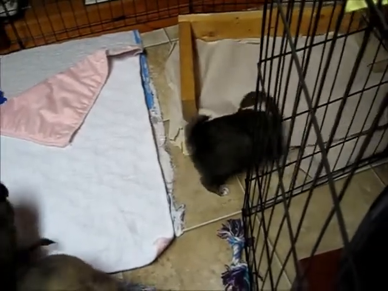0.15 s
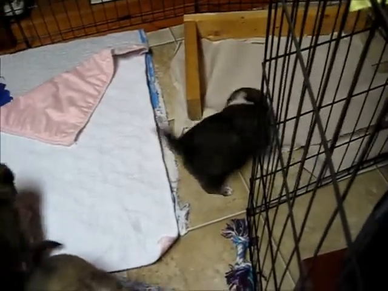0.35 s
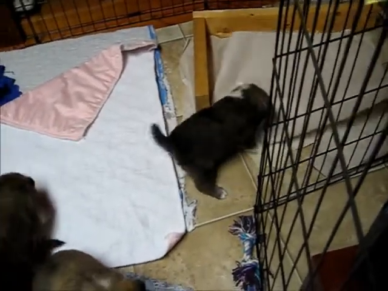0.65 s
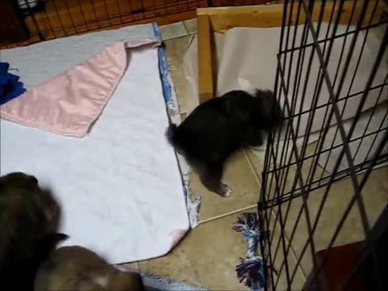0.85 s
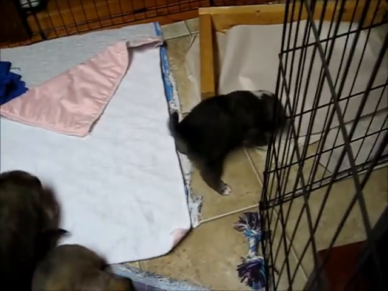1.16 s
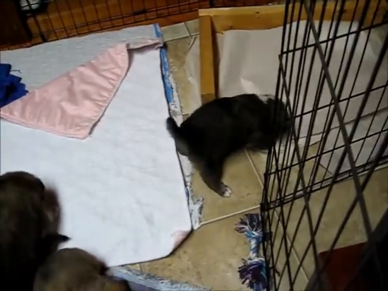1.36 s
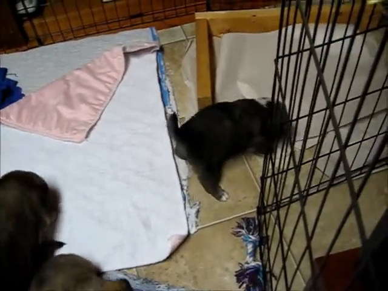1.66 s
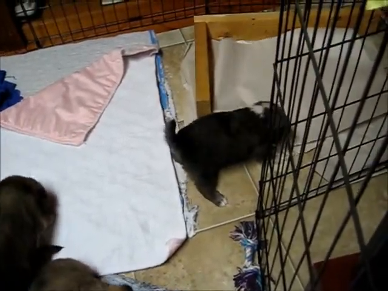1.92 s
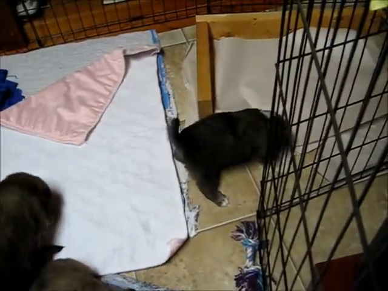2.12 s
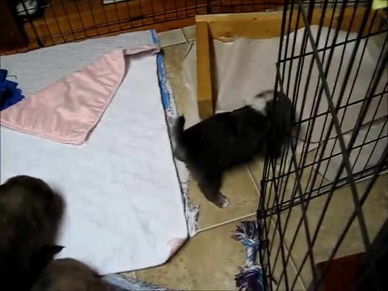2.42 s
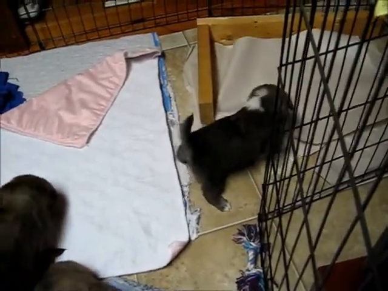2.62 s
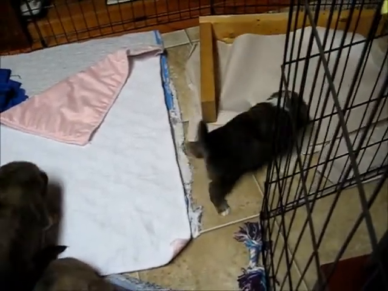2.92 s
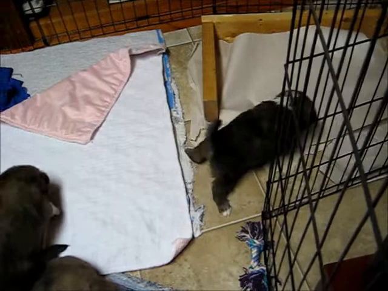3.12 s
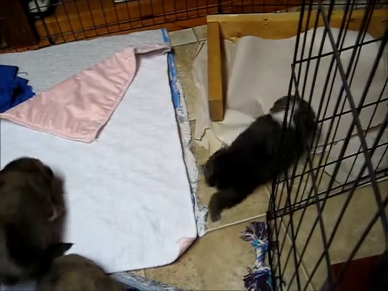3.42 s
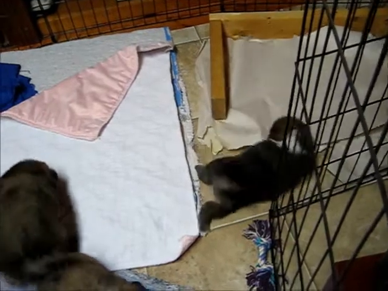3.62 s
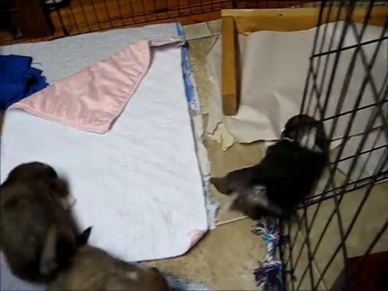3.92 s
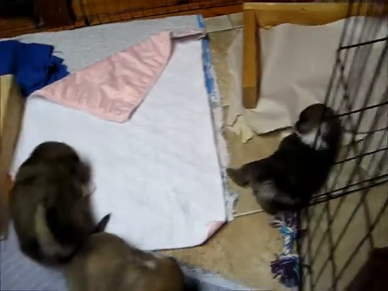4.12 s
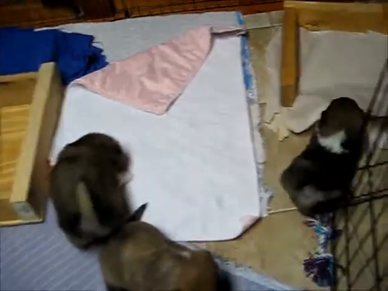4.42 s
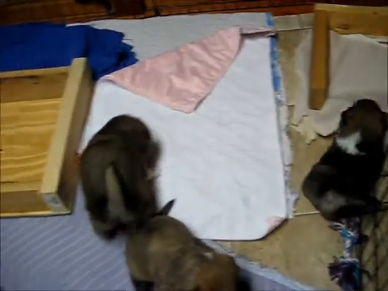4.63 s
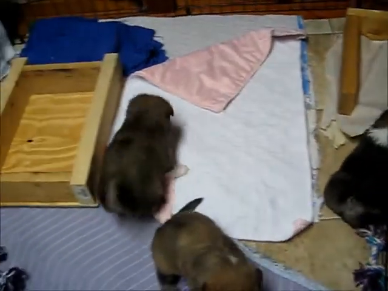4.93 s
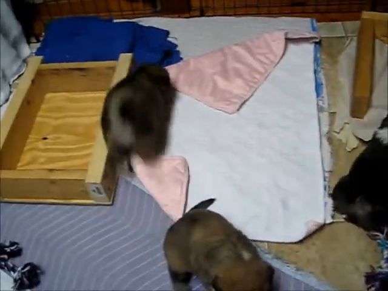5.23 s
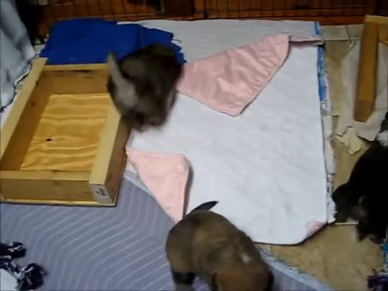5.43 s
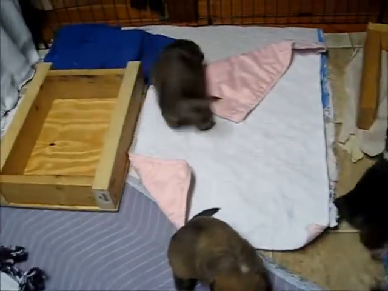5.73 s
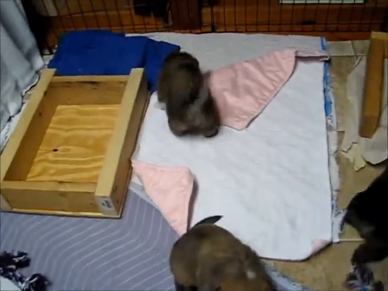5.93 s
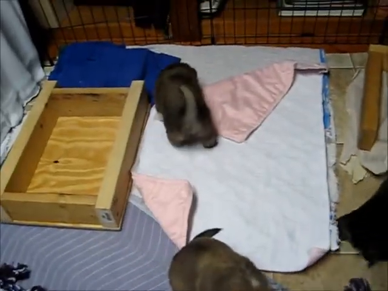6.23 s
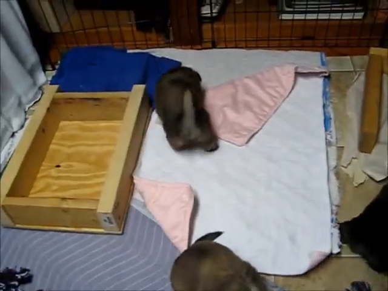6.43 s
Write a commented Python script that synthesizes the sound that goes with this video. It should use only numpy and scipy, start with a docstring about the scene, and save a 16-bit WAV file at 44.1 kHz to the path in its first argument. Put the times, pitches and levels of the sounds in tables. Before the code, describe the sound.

Puppies move around a pen in a small tiled room, heard from nearby with only brief reflections. From the start, claws tick sharply on tile and crinkle paper, mixed with short scratchy rustles of paws dragging over floor pads, with a strong cluster around 0.6 seconds. A few taps follow until 1.4 seconds, then the movement eases to faint shuffling. Ticks and scuffs return from about 2 to 2.7 seconds, followed by a quieter stretch around 3.2 seconds. From 3.6 seconds the pattering and rustling grow busy again, with sharper clicks near 5 and 5.3 seconds. After a brief lull near 5.9 seconds, a last flurry of taps and scraping comes around 6.2 seconds and trails into rustling. A few soft, dull footfalls are barely audible. A quiet hiss, rumble, hum and thin high electrical whine run throughout.

```python
"""A small room with a tiled floor, where puppies scramble about in a wire pen.
Impacts of claws tick on the tiles and crumple paper, and each knock briefly excites the pen's resonances.
Padded paws thump softly and drag over the floor pads, rustling by stick-slip friction.
Wall reflections follow the impacts; behind all lie a quiet rumble, hiss, hum and a thin electrical whine."""
import sys
import numpy as np
from scipy import signal
from scipy.fft import rfft, irfft
from scipy.io import wavfile

SR = 44100
rng = np.random.default_rng(int(sys.argv[2]) if len(sys.argv) > 2 else 0)


def inscribe(sig):
    """Save sig as 16-bit PCM at rate SR to the path in sys.argv[1].

    A 1-D sig is mono; a 2-D sig holds one channel per row.
    Samples are clipped to [-1, 1] before scaling.
    """
    pcm = np.round(np.clip(np.atleast_2d(sig).T, -1, 1) * 32767)
    wavfile.write(sys.argv[1], SR, pcm.astype(np.int16))


N = 289296
TIME = np.arange(N) / SR

# paw strikes and paper snaps:
# (time [s], middle-band level [dB], tick's energy share [0-1], treble [dB re level], ring pitch [Hz])
STRIKES = [(0.05, -20, 0.72, -8.5, 3960), (0.07, -22, 0.23, -8, 1490), (0.249, -22.5, 0.16, -28, 2600),
           (0.382, -27.5, 0.66, -4.5, 5800), (0.403, -25, .2, -12, 3170), (0.461, -27, 0.4, -12, 1590),
           (0.579, -25, 0.3, -11, 4100), (0.589, -21, .2, -6.5, 4080), (0.602, -18.5, 0.86, -3, 5630),
           (0.624, -19, 0.17, -4, 4300), (0.769, -31, 0.8, -21, 2530), (0.819, -27.5, 0.2, -24, 2000),
           (0.866, -27, .1, -30, 2560), (1.049, -23, 0.06, -10, 1200), (1.064, -20.5, 0.2, -7.5, 1050),
           (1.3715, -24.5, 0.3, -1.5, 970), (1.374, -23, 0.96, -20, 3740), (1.432, -37.5, 0.7, -18, 4200),
           (1.661, -39.5, 0.06, -21, 1500), (1.718, -35.5, 0.3, -30, 810), (1.778, -26, 0.24, -17, 3480),
           (2.056, -24.5, 0.2, -5.5, 4960), (2.097, -32.5, 0.3, -11, 3000), (2.135, -28.5, 0.45, -8, 3040),
           (2.317, -26.5, 0.7, -16, 1110), (2.343, -26, 0.7, -3, 3230), (2.443, -26, 0.84, -15, 940),
           (2.597, -33.5, 0.24, -7, 547), (2.695, -23, 0.16, -11.5, 2120), (2.957, -36.5, 0.9, -11, 1290),
           (3.206, -39, 0, -22, 680), (3.371, -34, 0.2, -21, 1810), (3.644, -25.5, .6, -6, 4650),
           (3.773, -28, .9, -31, 3130), (3.803, -26.5, 0.4, -7.5, 3500), (3.996, -25, 0.6, -14, 3650),
           (4.059, -29.5, 0.13, -24, 2400), (4.158, -24.5, 0.56, -6, 3940), (4.259, -26, 0.5, -11, 5040),
           (4.285, -26.5, 0.4, -14, 4000), (4.303, -24.5, 0, -9, 2920), (4.354, -24, 0.9, -12, 3320),
           (4.796, -28.5, 0, -4.5, 4020), (4.811, -27.5, 0.5, -7, 2780), (4.873, -30.5, 0.37, -7, 910),
           (4.896, -26, 0.3, -18, 3050), (4.971, -17.5, 0.44, -6.5, 2970), (5.144, -34, 0.8, -7.5, 2900),
           (5.202, -34, 0.4, -25, 2860), (5.251, -19, 0.08, -12.5, 3350), (5.306, -22.5, 0.25, -9.5, 3080),
           (5.351, -25.5, 0.3, -10.5, 2520), (5.389, -25, 0.16, -17, 2000), (5.404, -24.5, 0.5, -0.5, 4940),
           (5.464, -23.5, .6, -8.5, 2300), (5.625, -24, 0.2, -2, 1000), (5.766, -34, 0.8, -2, 3000),
           (5.978, -33.5, 0.5, -10, 3000), (6.045, -30, 0.07, -19, 1900), (6.104, -27.5, 0.1, -7, 2700),
           (6.169, -21.5, .2, -6, 4770), (6.181, -19.5, 0.16, -9, 2380), (6.216, -23.5, 0.1, -17, 2400),
           (6.256, -24.5, 0.15, -9, 1300), (6.324, -18.5, 0.35, -6, 2330)]
# strokes of a paw or body over paper and pads:
# (start [s], length [s], rustle level [dB], dull scuff [dB re rustle], crisp treble [dB re rustle])
STROKES = [(0.006, 0.087, -28, -10, -8), (0.17, 0.12, -33, -8, -11), (0.364, 0.099, -31.5, -5, -4.5),
           (0.536, 0.099, -27, -11, -8), (0.667, 0.115, -34.5, -28, -2), (0.755, 0.049, -21.5, -23, -15),
           (0.855, 0.13, -32.5, -10.5, -9), (1.16, 0.26, -38.5, -12, -10.5), (1.42, 0.069, -43.5, -18, -6),
           (1.614, 0.23, -54, 7, -28), (1.97, 0.10, -41, -14, -6), (2.216, 0.093, -27.5, -16.5, -10),
           (2.386, 0.13, -28, -5.5, -15), (2.577, 0.21, -37.5, -5.5, -16), (2.853, 0.034, -37.5, -2, -6),
           (2.962, 0.06, -33.5, -13, -4), (3.06, 0.076, -44.5, -5, -4), (3.388, 0.16, -37, -13, -3.5),
           (3.6, 0.22, -27.5, -13, -11), (3.88, 0.062, -32.5, -20, -5), (4.072, 0.05, -34.5, -7, -5),
           (4.324, 0.1, -25, -12.5, -8), (4.458, 0.14, -32.5, -16.5, -3), (4.659, 0.18, -34.5, -30, -5),
           (4.912, 0.11, -27, -8, -9.5), (5.103, 0.21, -36.5, -10, -8), (5.252, 0.28, -33, -4.5, -15),
           (5.55, 0.059, -33, 2, -12), (5.64, 0.024, -31.5, -11, -12), (5.75, 0.034, -36, -1, -11),
           (6.167, 0.19, -24, -9, -14.5), (6.407, 0.22, -32.5, -7, -9)]
# faint shuffle of bodies between strokes: (low band [dB], middle band [dB], treble band [dB])
SHUFFLE_DB = [-47, -42, -50]
# moments when the puppies hold nearly still: (start [s], length [s])
RESTS = [(1.556, 0.14), (1.86, 0.12), (3.227, 0.11), (5.848, 0.11)]
# soft footfalls on the pads: (time [s], level [dB])
FOOTFALLS = [(0.441, -61), (0.592, -65), (2.438, -68), (2.597, -55), (2.691, -58), (5.709, -55.5),
             (6.331, -70)]
# normal modes of the pen and floor: (frequency [Hz], bandwidth [Hz], gain [dB])
PEN_MODES = [(480, 140, -1.5), (894, 104, -2), (1177, 30, -0.5)]
# low, middle and treble band: (lower edge [Hz], upper edge [Hz])
BANDS_HZ = [(150, 1500), (1500, 6000), (6000, 17000)]
# reverberation time of the room: (low band [s], middle band [s], treble band [s])
ROOM_T60 = [0.19, 0.21, 0.25]
# spectral envelopes of impacts, friction and room noise: (frequency [Hz], relative level [dB])
STRIKE_SPECTRUM = [(200, -26), (450, -12), (700, -6), (1000, -1), (1700, 1), (2500, 4), (4000, 3.5),
                   (5600, -1), (7500, -9), (10000, -15), (16000, -31.5)]
DRAG_SPECTRUM = [(200, -13.5), (450, -10.5), (700, -2.5), (1000, -1), (1700, 2), (2500, 6), (4000, 4),
                 (5600, 0), (7500, -6.5), (10000, -10.5), (16000, -26.5)]
NOISE_SPECTRUM = [(20, -4.5), (80, 1.5), (140, 2.5), (300, 3), (600, 3.5), (1200, -5), (2500, 3.5),
                  (6500, -0.5), (7300, -10), (7650, -1), (8400, -2.5), (9200, -1.5), (10000, 6),
                  (10700, -1), (11300, -1), (12300, -9), (16000, -18)]
# mains hum and electrical whine: (frequency [Hz], rms level [dB])
ELECTRICAL_TONES = [(120, -71.5), (7560, -57), (15140, -64.5)]


def strikes(rows, tick_s=0.0013, crumple_s=0.01, press_s=0.0007, ring_q=5.1, wet_db=(-3, -3, -4)):
    """Impact excitation: a claw tick and a burst of crumpling ring each spot at its own frequency."""
    t = TIME[:SR // 4]
    out = np.zeros(N + len(t))
    for time, level_db, tick_share, treble_db, ring_hz in rows:
        thud_db = -4.5 - 6 * np.log2(ring_hz / 1000)   # the lower a spot rings, the heavier its thud
        band_db = level_db + np.array([thud_db, 0, treble_db])
        tick = rng.standard_normal(len(t)) * np.exp(-t / tick_s)
        crumple = grains(len(t), per_s=3900, spread_db=3.0)
        crumple *= np.exp(-t / crumple_s) * (1 - np.exp(-t / press_s))
        contact = np.sqrt(tick_share) * tick / rms(tick) + np.sqrt(1 - tick_share) * crumple / rms(crumple)
        wet_gains = from_db(np.array(wet_db) - 9 * tick_share)   # clean ticks on bare tile stop sooner
        start = int(time * SR)
        for edges, db, wet, t60 in zip(BANDS_HZ, band_db, wet_gains, ROOM_T60):
            reverberant = contact + wet * reverberation(t, t60)
            knock = pen(colour(reverberant, STRIKE_SPECTRUM))
            band = band_pass(knock + resonance(knock, ring_hz, ring_hz / ring_q), edges)
            out[start:start + len(t)] += from_db(db) * band / rms(band[:SR // 32])   # first 31 ms set the level
    return out[:N]


def patter(rustle, count=18, above_rustle_db=1, spread_db=1, tick_share=0.43, treble_db=-10):
    """Random point process: stray claw ticks about as strong as the rustle, as rows like STRIKES."""
    rows = []
    for when, softness, spot in rng.random((count, 3)):
        at = int(when * N)
        level_db = 20 * np.log10(rustle[at]) + above_rustle_db - spread_db * (2 * softness - 1)
        ring_hz = np.interp(spot, [0, 1], (1500, 4860))
        rows.append((at / SR, level_db, tick_share, treble_db, ring_hz))
    return rows


def dragging(band_gains, slip_db=1.0, crackle_db=-6.0, flex_db=-12.5):
    """Stick-slip friction: fur and cloth catch and slip over crackling paper."""
    friction = rng.standard_normal(N) + from_db(crackle_db) * grains(N, per_s=350, spread_db=3.5)
    friction *= from_db(slip_db * wander(hz=27.0))
    rustle = pen(colour(friction, DRAG_SPECTRUM))
    # as the paper bends, its resonances come and go
    paper = sum(resonance(rustle, hz, hz / 6) * wander(hz=8.2) for hz in np.geomspace(600, 6000, 12))
    rustle += from_db(flex_db) * paper
    out = np.zeros(N)
    for edges, gain in zip(BANDS_HZ, band_gains):
        band = band_pass(rustle, edges)
        out += gain * band / rms(band)
    return out


def drag_gains(attack_s=0.03, release_s=0.049, rest_fade_s=0.027, rest_db=-5.5):
    """Incoherent sources add in power: band gains of strokes over a shuffle that sinks in the rests."""
    moving = np.ones(N)
    for start, length in RESTS:
        outside_s = np.maximum(start - TIME, TIME - start - length)
        moving *= np.clip(outside_s / rest_fade_s, from_db(rest_db), 1)
    power = np.outer(from_db(SHUFFLE_DB), moving) ** 2
    for start, length, level_db, dull_db, crisp_db in STROKES:
        first = int(start * SR)
        t = TIME[:min(SR // 2, N - first)]
        envelope = np.minimum(t / attack_s, 1) * np.exp(-np.maximum(t - length, 0) / release_s)
        gains = from_db(level_db + np.array([dull_db, 0, crisp_db]))
        power[:, first:first + len(t)] += np.outer(gains, envelope) ** 2
    return np.sqrt(power)


def footfalls(hz=290, width_hz=190, t60=0.2):
    """Soft contact excites mainly low frequencies: a padded paw's dull puff lingers in the room."""
    t = TIME[:SR // 4]
    out = np.zeros(N + len(t))
    for time, db in FOOTFALLS:
        puff = resonance(resonance(reverberation(t, t60), hz, width_hz), hz, width_hz)
        start = int(time * SR)
        out[start:start + len(t)] += from_db(db) * puff / rms(puff)
    return out[:N]


def pen(contact):
    """Forced vibration: a contact drives the modes of the pen and floor, which add to its sound."""
    return contact + sum(from_db(db) * resonance(contact, hz, width) for hz, width, db in PEN_MODES)


def reverberation(t, t60, build_s=0.0016):
    """Diffuse field: dense wall reflections merge into noise that falls 60 dB in t60 seconds; rms 1."""
    wash = rng.standard_normal(len(t)) * np.exp(-np.log(1000) * t / t60) * (1 - np.exp(-t / build_s))
    return wash / rms(wash)


def background(noise_db=-44.5, pitch_waver=0.0016):
    """Superposition: broadband rumble and hiss with slightly wavering tones of mains hum and whine."""
    noise = colour(rng.standard_normal(N), NOISE_SPECTRUM)
    clock = np.cumsum(1 + pitch_waver * wander(hz=15)) / SR
    tones = sum(from_db(db) * np.sqrt(2) * np.sin(2 * np.pi * hz * clock) for hz, db in ELECTRICAL_TONES)
    return from_db(noise_db) * noise / rms(noise) + tones


def grains(length, per_s, spread_db):
    """Shot noise: tiny slips and fibre snaps at random moments, a few much larger than the rest; rms 1."""
    sizes = from_db(spread_db * np.minimum(rng.exponential(1, length), 4))
    clicks = sizes * rng.choice([-1, 1], length) * (rng.random(length) < per_s / SR)
    return clicks / rms(clicks)


def wander(hz):
    """Band-limited noise: a random fluctuation that swings about hz times a second; rms 1."""
    slow = resonance(resonance(rng.standard_normal(N), hz, hz), hz, 2 * hz)
    return slow / rms(slow)


def resonance(x, hz, width_hz):
    """Damped oscillator: a two-pole resonance with unit gain at its peak."""
    radius = np.exp(-np.pi * width_hz / SR)
    feedback = [1, -2 * radius * np.cos(2 * np.pi * hz / SR), radius ** 2]
    return signal.lfilter(np.array([1, 0, -1]) * (1 - radius ** 2) / 2, feedback, x)


def colour(x, spectrum, size=4096):
    """Minimum-phase filtering: folding the cepstrum gives a causal response with the given spectrum."""
    known_hz, known_db = np.transpose(spectrum)
    hz = np.linspace(0, SR / 2, size // 2 + 1)
    gain_db = np.interp(np.log(np.maximum(hz, 1)), np.log(known_hz), known_db)
    cepstrum = irfft(np.log(from_db(gain_db)))
    cepstrum[1:size // 2] *= 2
    cepstrum[size // 2 + 1:] = 0
    response = irfft(np.exp(rfft(cepstrum)))
    return signal.fftconvolve(x, response)[:len(x)]


def band_pass(x, edges_hz):
    """Crossover filtering: neighbouring bands meet at their half-power points."""
    return signal.sosfilt(signal.butter(3, edges_hz, "band", fs=SR, output="sos"), x)


def from_db(db):
    """Amplitude ratio of a level in decibels."""
    return 10 ** (np.asarray(db) / 20)


def rms(x):
    """Effective amplitude: the root mean square."""
    return np.sqrt(np.mean(x ** 2) + 1e-20)


def scene():
    """Linear superposition: the puppies and the background sum in one channel."""
    band_gains = drag_gains()
    impacts = list(STRIKES) + patter(rustle=band_gains[1])
    return (strikes(impacts) + footfalls() + dragging(band_gains) + background())[None]


def record(dry, ceiling=0.93, cutoff_hz=15900):
    """Clipping and band limiting: peaks above the ceiling flatten, and the top treble is cut steeply."""
    low_pass = signal.ellip(10, 0.05, 60, cutoff_hz, fs=SR, output="sos")
    return signal.sosfiltfilt(low_pass, np.clip(dry, -ceiling, ceiling))


dry = scene()
out = record(dry)
inscribe(out)
```